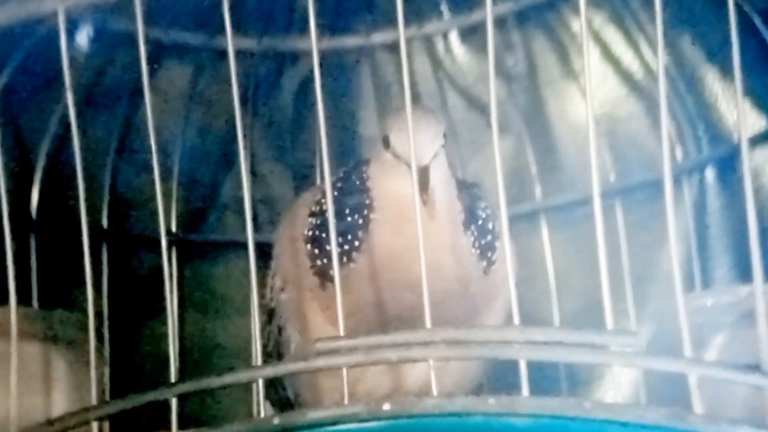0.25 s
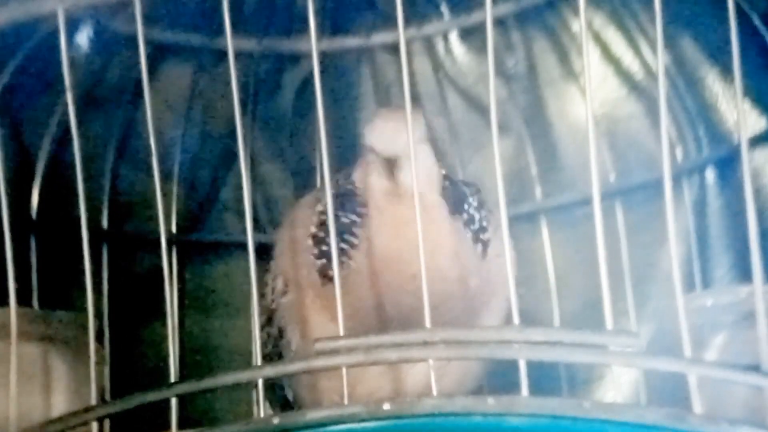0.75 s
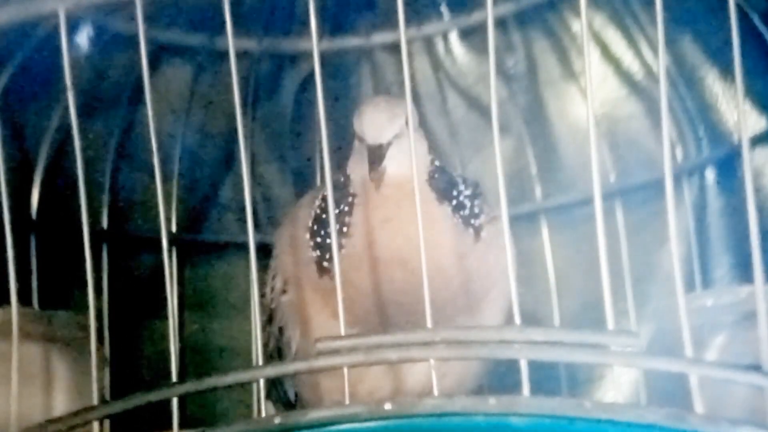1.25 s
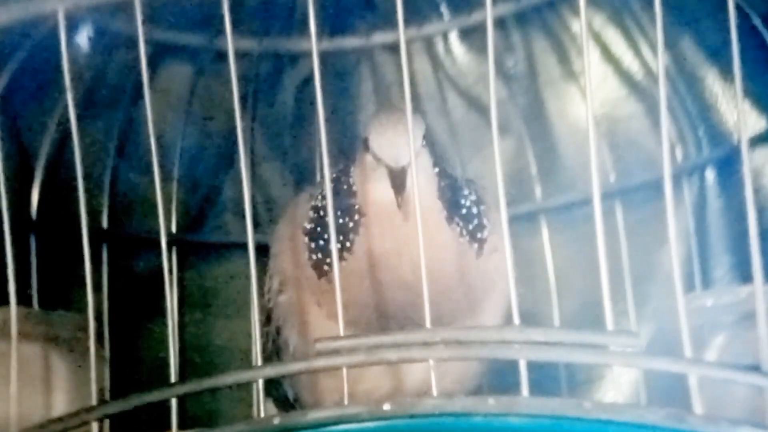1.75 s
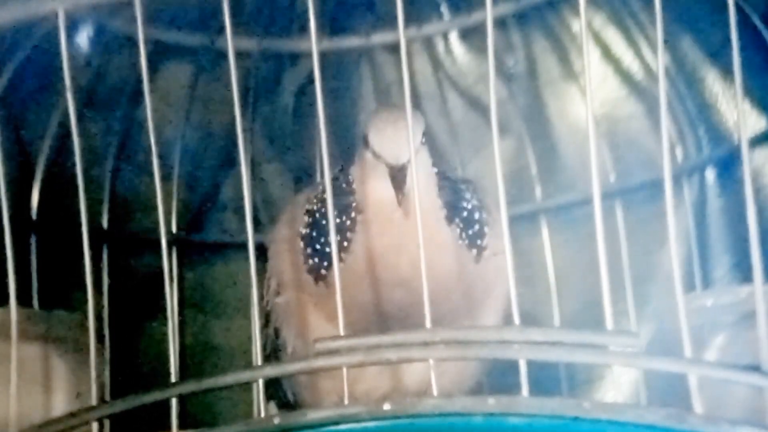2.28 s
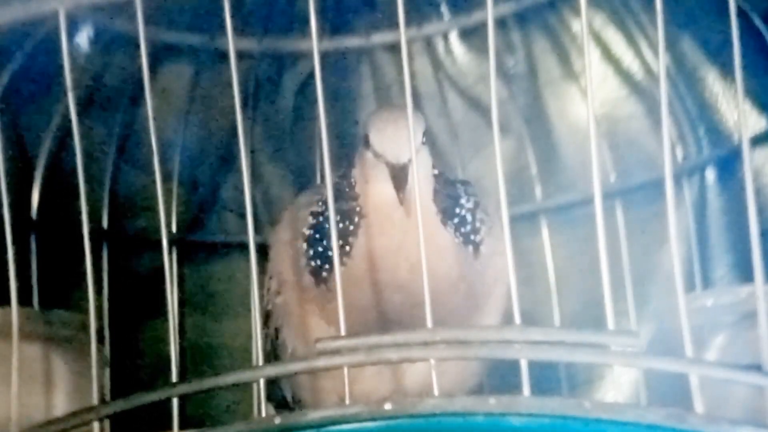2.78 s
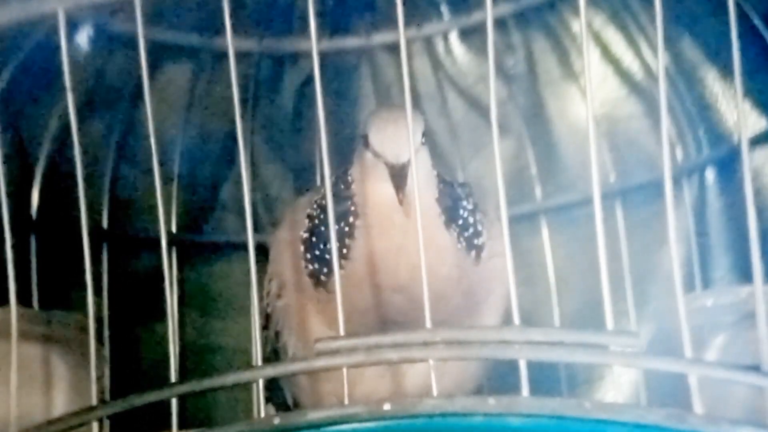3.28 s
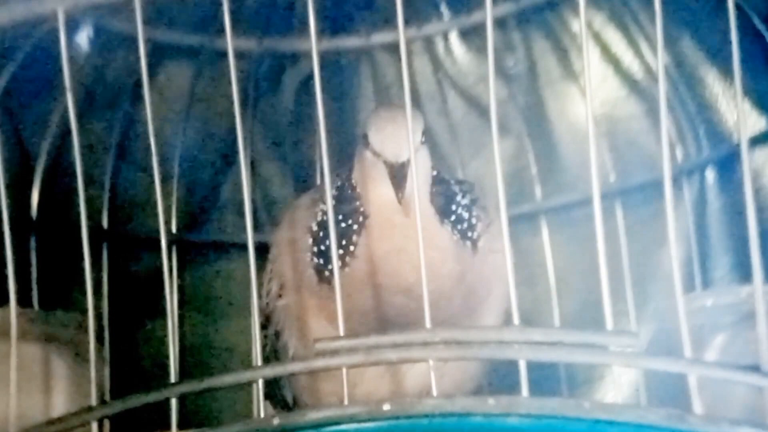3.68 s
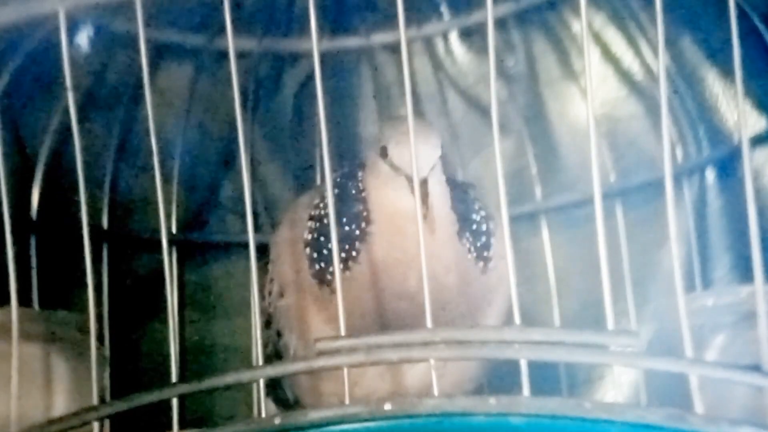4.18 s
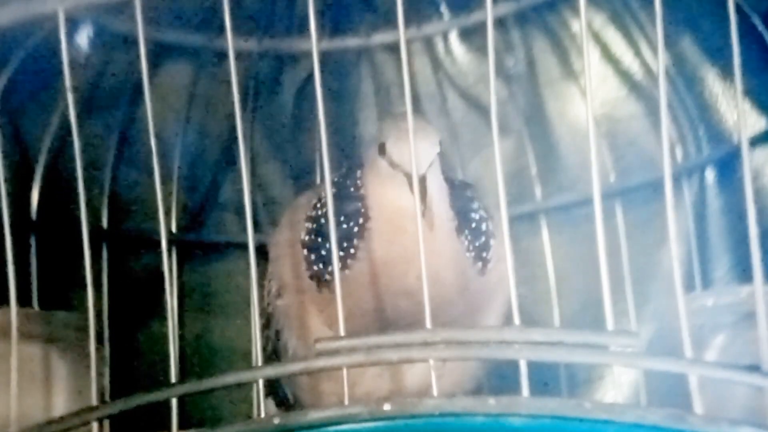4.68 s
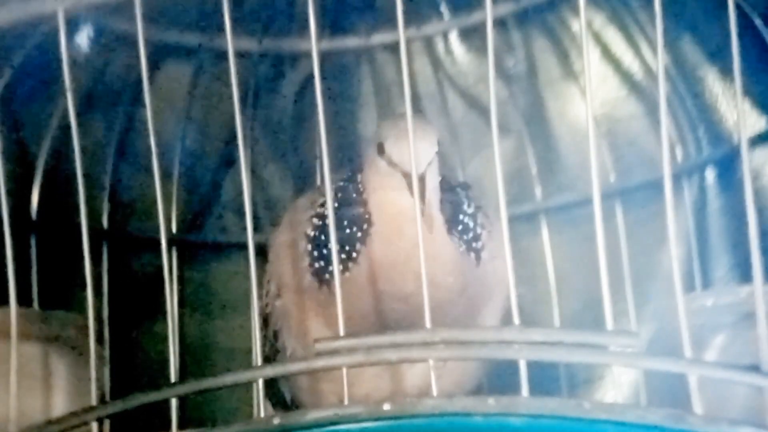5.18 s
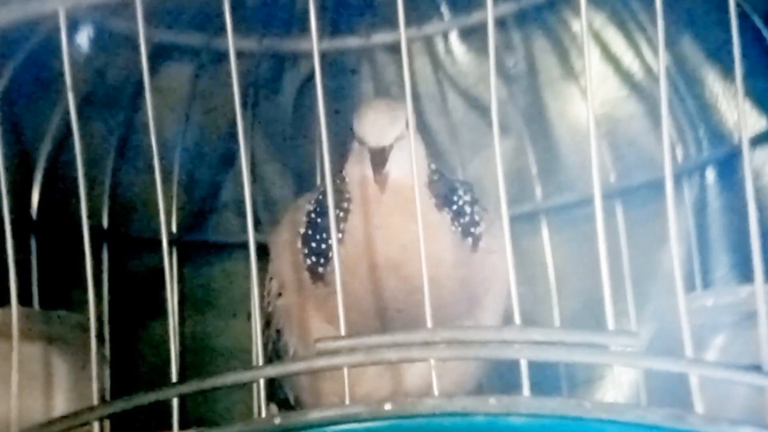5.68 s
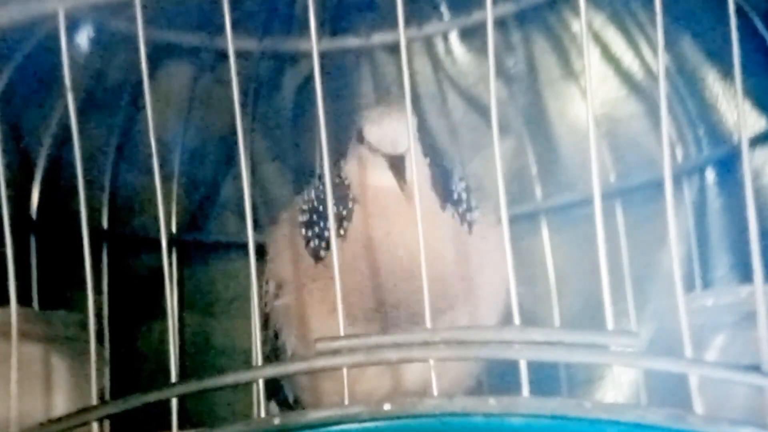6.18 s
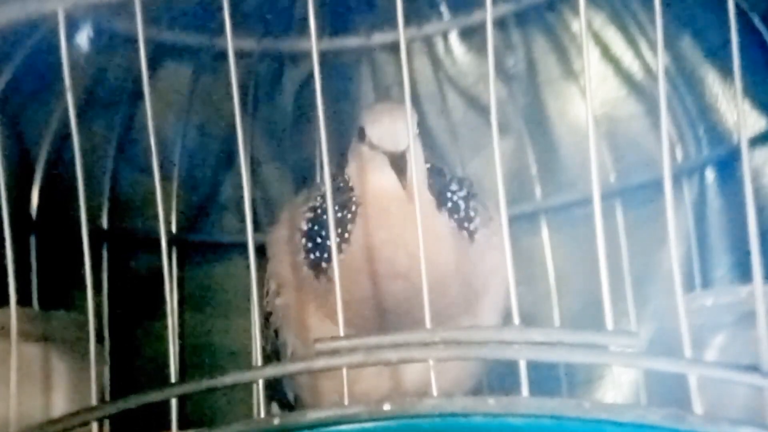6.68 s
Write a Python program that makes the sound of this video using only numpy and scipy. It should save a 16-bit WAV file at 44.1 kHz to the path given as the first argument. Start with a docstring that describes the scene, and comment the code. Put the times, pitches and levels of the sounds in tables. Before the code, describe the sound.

A caged dove coos close by in low, purring three-note phrases, with one dull woody bang and faint small birds chirping in a quiet yard.

```python
"""Caged dove in a yard

A caged spotted dove coos close by in three-note phrases: near-pure tones that flutter into a purr.
Standing waves ring its cage, shaped noise gives its feathers, its perch and the hiss of a single bang,
whose ring is a set of decaying modes. Small birds, as gliding tones with diffuse echoes, chirp and whistle
far off over a low outdoor murmur."""
import sys
import numpy as np
from scipy import signal
from scipy.fft import rfft, irfft
from scipy.io import wavfile
from scipy.ndimage import uniform_filter1d, minimum_filter1d

SR = 44100
rng = np.random.default_rng(int(sys.argv[2]) if len(sys.argv) > 2 else 0)


def generate_wav(sig):
    """Save sig (samples, or channels by samples) to the path in sys.argv[1] as 16-bit PCM at SR."""
    pcm = np.round(np.clip(np.atleast_2d(sig).T, -1, 1) * 32767).astype(np.int16)
    wavfile.write(sys.argv[1], SR, pcm)


N = 306054
TIME = np.arange(N) / SR


def gain_of(db):
    """Logarithmic level: decibels become an amplitude ratio."""
    return 10 ** (np.asarray(db) / 20)


def evened(x):
    """Power normalization: scales a signal to rms 1."""
    return x / np.sqrt(np.mean(x ** 2) + 1e-20)


def read(points, hz):
    """Spectral interpolation along a logarithmic frequency axis."""
    point_hz, value = np.transpose(points)
    return np.interp(np.log(hz + 1), np.log(point_hz + 1), value)


def curves(rows):
    """Linear interpolation: a time axis over the rows, and each further column along it."""
    s, *columns = np.transpose(rows)
    t = np.arange(s[0], s[-1], 1 / SR)
    return [t] + [np.interp(t, s, column) for column in columns]


def add(mix, s, sound):
    """Superposition: adds a sound at time s, which may lie before time 0."""
    at = round(s * SR)
    sound = sound[max(-at, 0):]
    part = mix[max(at, 0):][:len(sound)]
    part += sound[:len(part)]


def swell(t, centre_s, half_s):
    """Gaussian envelope of height 1; half_s is its half length at 1/e."""
    return np.exp(-((t - centre_s) / half_s) ** 2)


def wander(size, rate_hz):
    """Low-passed noise: a random fluctuation, of rms 1 over the whole scene's length."""
    hz = np.fft.rfftfreq(N, 1 / SR)
    lowpass = np.exp(-(hz / rate_hz) ** 2)
    return evened(irfft(rfft(rng.standard_normal(N)) * lowpass, N))[:size]


def tone(hz, overtones):
    """Harmonic series on a moving pitch, phase being the integral of frequency; 0 dB is rms 1."""
    phase = 2 * np.pi * np.cumsum(hz) / SR
    return np.sqrt(2) * sum(gain_of(db) * np.sin(round(multiple) * phase) for multiple, db in overtones)


# likeness of diffuse noise at the two microphones: frequency_hz, correlation (-1 to 1)
COHERENCE = [(60, .88), (300, .82), (640, .25), (1400, 0), (15000, .05)]
# spectral difference between the microphones: frequency_hz, left_minus_right_db
LEFT_RIGHT_TILT = [(110, 0.5), (200, -1), (380, 3), (700, 5), (1300, 2), (2400, -2), (5000, -0.5),
                   (9000, -6.5), (15000, -3)]


def noise(spectrum):
    """Diffuse-field coherence: the microphones agree in the bass and hardly at all in the treble."""
    hz = np.fft.rfftfreq(N, 1 / SR)
    a, b = rfft(rng.standard_normal((2, N)))
    same = np.clip(read(COHERENCE, hz), -1, 1)
    pair = np.array([a, same * a + np.sqrt(1 - same ** 2) * b])
    pair *= gain_of(np.outer([.5, -.5], read(LEFT_RIGHT_TILT, hz)))
    x = irfft(pair * gain_of(read(spectrum, hz)), N)
    return x / x.mean(0).std()  # the mean of the two channels has rms 1


# ring time of the yard: frequency_hz, t60_s
YARD_RING = [(150, 0.63), (400, 0.76), (1000, 0.52), (2800, .36), (8000, 0.77)]


def dying(x):
    """Exponential reverberant decay: each band fades at the yard's own ring time."""
    hz, t, bands = signal.stft(x, SR, nperseg=256)
    fade_db = -60 * t / read(YARD_RING, hz)[:, None]
    return signal.istft(bands * gain_of(fade_db), SR, nperseg=256)[1]


def yard(x):
    """Diffuse reverberation: convolution with decaying noise, independent at each microphone."""
    tail = dying(rng.standard_normal((2, SR)))
    tail[:, :300] = 0  # the echoes come after a short gap
    return signal.fftconvolve(x[None], tail / np.linalg.norm(tail[0]), axes=1)[:, :N]


# spectrum of the outdoor murmur: frequency_hz, relative_density_db (per Hz)
MURMUR_SPECTRUM = [(15, -69.5), (25, -30), (103, -1.5), (268, -9), (306, -7), (357, -13), (436, -5),
                   (569, -15.5), (650, -13.5), (794, -15.5), (868, -13), (991, -25), (1060, -24),
                   (2510, -36.5), (5000, -68), (6500, -70), (11000, -120)]
# slow course of the murmur's level: time_s, level_db
MURMUR_LEVEL = [(0, -48), (2.5, -47), (4.6, -46), (5.7, -51.5), (6.94, -43.5)]
# faint hums: frequency_hz, level_db (against the murmur)
MURMUR_HUMS = [(104, -6.5), (150, -11), (298, -12), (400, -11), (442, -15), (542, -11), (640, -8.5),
               (700, -12.5), (845, -20.5)]


def murmur(murmur_db=0.0, swell_db=1.64):
    """Broadband ambient noise, with narrow-band hums whose pitch and amplitude waver."""
    level_db = np.interp(TIME, *np.transpose(MURMUR_LEVEL)) + swell_db * wander(N, 18)
    out = gain_of(murmur_db) * noise(MURMUR_SPECTRUM)
    for hz, db in MURMUR_HUMS:
        hum = tone(hz + 6 * wander(N, 14), [(1, db)]) * (1 + .35 * wander(N, 14))
        out += gain_of([[.5], [-.5]] * read(LEFT_RIGHT_TILT, np.array([hz]))) * hum
    return gain_of(level_db) * out


def thin_tone(length, hz, db, waver, droop_hz=0):
    """Frequency modulation: one soft-edged note that wavers and may droop in pitch."""
    size = int(length * SR)
    pitch_hz = (hz - droop_hz * np.linspace(0, 1, size)) * (1 + waver * wander(size, 140))
    return gain_of(db) * signal.windows.tukey(size, .4) * tone(pitch_hz, [(1, 0)])


# far whistled notes, and at 1.771 s a thin high overtone of the dove's rising coo:
# start_s, length_s, pitch_hz, relative_level_db
WHISTLES_AND_OVERTONE = [(.39, .29, 2160, -63), (1.771, .13, 3160, -59.5), (2.233, 0.2, 1460, -46),
                         (2.512, 0.11, 1650, -45), (2.718, 0.19, 1610, -57), (3.262, 0.29, 1454, -48),
                         (3.62, .14, 1655, -41.5), (3.656, 0.18, 1416, -51.5), (3.837, 0.17, 1640, -40.5),
                         (3.997, .27, 1630, -48)]
# another bird's thin high notes: start_s, length_s, relative_level_db
HIGH_NOTES = [(4.48, 0.092, -55), (4.961, 0.22, -59), (5.354, 0.44, -64), (5.866, 0.32, -60.5),
              (6.14, 0.47, -60.5), (6.598, 0.31, -57.5)]
HIGH_HZ, HIGH_SINK_HZ_PER_S = 6530, 260  # pitch at the start of the series, and how fast the series sinks
# far-off haze round the whistles: frequency_hz, relative_density_db (per Hz)
HAZE_SPECTRUM = [(200, -28), (450, 5.5), (720, 12), (950, -7.5), (1300, -4.5), (1600, -7), (1950, -6),
                 (2300, -20), (4000, -32.5)]
HAZE_AT_S, HAZE_WIDTH_S, HAZE_TOP_DB, HAZE_REST_DB = 3.7, 1.0, -47, -72.5  # it swells once


def whistles_and_overtone(direct_db=-10, echo_db=-2):
    """Direct-to-reverberant ratio: far whistles and one overtone of the coo, mostly as echoes, in a haze."""
    out = np.zeros(N)
    for s, length, hz, db in WHISTLES_AND_OVERTONE:
        add(out, s, thin_tone(length, hz, db, waver=0.019))
    for s, length, db in HIGH_NOTES:
        hz = HIGH_HZ - HIGH_SINK_HZ_PER_S * (s - HIGH_NOTES[0][0])
        add(out, s, thin_tone(length, hz, db, waver=0.012, droop_hz=109))
    haze_level = gain_of(HAZE_REST_DB) + gain_of(HAZE_TOP_DB) * swell(TIME, HAZE_AT_S, HAZE_WIDTH_S)
    return gain_of(direct_db) * out + gain_of(echo_db) * yard(out) + haze_level * noise(HAZE_SPECTRUM)


# falling chirps of a small bird: reference_moment_s, relative_level_db
CHIRP_TIMES = [(0.527, -46.5), (1.726, -43.5), (2.701, -46.5), (3.616, -43.5), (4.646, -42.5)]
# shape of one chirp: time_s (from the reference moment), pitch_hz, relative_level_db, rasp (share of pitch)
CHIRP_SHAPE = [(-.125, 4575, -21.5, 0.0015), (-.08, 4480, -10, 0.011), (-.036, 3927, -8, 0.028),
               (-.02, 3700, -9, 0.063), (-.006, 3036, -1, 0.035), (.012, 2820, 3.5, .05),
               (.04, 2847, -6.5, 0.038), (.058, 2880, -21, 0.026)]


def chirps(level_db=-6, direct_db=-3):
    """Downward glide with random frequency modulation as rasp, drawn out by the yard's reverberation."""
    out = np.zeros(N)
    t, hz, shape_db, rasp = curves(CHIRP_SHAPE)
    for s, db in CHIRP_TIMES:
        raspy_hz = hz * (1 + rasp * wander(len(t), 250))
        add(out, s + t[0], gain_of(db + shape_db) * tone(raspy_hz, [(1, 0.018)]))
    return gain_of(level_db) * (gain_of(direct_db) * out + yard(out))


# the bang and its first echoes: start_s, blow_level_db
BLOWS = [(2.8803, 6.5), (2.8846, -4), (2.906, -10)]
# what the struck thing rings with: frequency_hz, start_level_db, t60_s
STRUCK_MODES = [(594, -29.5, 0.55), (775, -22.5, 0.67), (944, -38, 0.38), (1630, -40, .26),
                (1880, -33.5, 0.31)]
# spectrum of the bang's tail: frequency_hz, relative_density_db (per Hz)
BANG_TAIL_SPECTRUM = [(59, -60), (100, -18.5), (183, -26.5), (279, -17.5), (626, -7.5), (751, -13.5),
                      (870, -14.5), (1620, -18.5), (1780, -27.5), (1950, -24.5), (8000, -87), (10400, -100),
                      (17600, -120)]


def bang(ring_hz=700, ring_s=0.0023, rise_s=0.0014, tail_db=-17, swell_s=0.0068, right_db=-4):
    """Impulse excitation of damped modes: a dull blow, a woody ring, two hard echoes and the yard's tail."""
    t = TIME[:SR]
    blow = (1 - np.exp(-(t / rise_s) ** 2)) * np.exp(-t / ring_s) * np.sin(2 * np.pi * ring_hz * t)
    direct, tails = np.zeros(N), np.zeros((2, N))
    start = BLOWS[0][0]
    ring = sum(gain_of(db - 60 * t / t60) * np.sin(2 * np.pi * hz * t) for hz, db, t60 in STRUCK_MODES)
    add(direct, start, ring)
    for s, db in BLOWS:
        add(direct, s, gain_of(db) * blow)
    for channel, tail in zip(tails, dying(noise(BANG_TAIL_SPECTRUM)[:, :SR])):
        add(channel, start, tail[:SR] * (1 - np.exp(-t / swell_s)))
    return direct * gain_of([[0], [right_db]]) + gain_of(tail_db) * tails


# thuds as the dove bears down on its perch: loudest_moment_s, half_length_s, level_db
PERCH_THUDS = [(0.079, 0.16, -45), (2.36, .05, -44.5), (4.73, 0.03, -44.5)]
# spectrum of a thud: frequency_hz, relative_density_db (per Hz)
THUD_SPECTRUM = [(25, -26.5), (60, -1), (110, 2.5), (200, -13.5), (400, -33), (1500, -78.5)]


def perch():
    """Low-frequency noise bursts: soft, dull thuds as the dove bears down on its perch."""
    level = sum(gain_of(db) * swell(TIME, s, half_s) for s, half_s, db in PERCH_THUDS)
    return level * noise(THUD_SPECTRUM)


# the dove shifts its feathers; at 2.933 s, the bang's bright hiss:
# loudest_moment_s, half_length_s (before rise and fall), relative_level_db
RUSTLES_AND_HISS = [(0.067, 0.082, -66.5), (1.79, .07, -68.5), (2.495, 0.073, -58), (2.933, .09, -63),
                    (3.319, 0.022, -56), (3.4, 0.076, -56.5), (3.68, .09, -69.5), (3.808, .03, -61),
                    (3.958, 0.042, -49.5), (4.149, 0.069, -54.5), (4.82, 0.029, -57.5), (5.802, 0.067, -62),
                    (6.045, 0.16, -71), (6.46, 0.012, -45), (6.488, 0.099, -57.5), (6.678, 0.054, -56.5)]
# spectrum of feathers, lent to the bang's hiss: frequency_hz, relative_density_db (per Hz)
FEATHER_SPECTRUM = [(1000, -2.5), (2500, 2), (4500, 7), (7500, 4), (12000, 1.5), (15000, -2)]


def feathers_and_hiss(rest_db=-72, grain_db=2.0, rustle_db=-6.0, rise=0.8, fall=1.6):
    """Grainy noise bursts: feather friction and the bang's bright hiss, over a faint steady hiss."""
    level = np.zeros(N)
    for s, half_s, db in RUSTLES_AND_HISS:
        level += gain_of(db) * swell(TIME, s, half_s * np.where(TIME < s, rise, fall))
    grain = gain_of(rustle_db + grain_db * wander(N, 300))
    return (gain_of(rest_db) + level * grain) * noise(FEATHER_SPECTRUM)


# standing waves round the cage: frequency_hz, width_hz, left_gain, right_gain (before the right's loss),
# right_lead_rad
CAGE_MODES = [(641.3, 12, 3.15, 1.6, 2.5), (589.9, 16, 1.6, 1.2, -0.76), (457.3, 54, 0.85, 0.38, 0.3),
              (737, 15, 2.4, 0.45, 1.76), (381, 8.4, 3.2, 1.4, -0.2), (820, 37, 3.3, 0.34, 2.6)]


def cage(x, right_db=-3):
    """Resonance: standing waves swell as the pitch passes them; the right microphone is farther."""
    out = np.array([x, x])
    for hz, width, left, right, lead in CAGE_MODES:
        r = np.exp(-np.pi * width / SR)
        ring = 2 * signal.lfilter([1 - r], [1, -r * np.exp(2j * np.pi * hz / SR)], x)
        out += np.outer([left, right * np.exp(1j * lead)], ring).real
    return out * gain_of([[0], [right_db]])


# the three notes of a phrase, each: time_s (from its start), pitch_hz, effort_db, purr_depth (0-1),
# all before the variations of the single coo
SHORT = [(0, 422.3, -49.5, 0.6), (.017, 497.3, -20.5, 0), (.036, 567, -19.5, 0.16), (.06, 570, -15.5, 0),
         (.088, 470, -21.5, .5), (.113, 409.6, -34.5, 0.7), (.16, 444, -38, 0.4)]
RISING = [(0, 429.8, -41, 0.72), (.045, 457.4, -36, 0.5), (.09, 500.6, -20, 0.61), (.15, 582.7, -16.5, 0.4),
          (.19, 616.5, -20, 0.34), (.226, 633.2, -11.5, 0.044), (.25, 619, -11, .05), (.27, 500.7, -18, 1),
          (.295, 427.3, -42, .4)]
LONG = [(0, 394, -47, 0.35), (.02, 512.3, -24.5, 0.94), (.065, 634.9, -17, .55), (.12, 623.6, -12, 0.38),
        (.21, 601.3, -16, 0.79), (.285, 592, -16.5, 0.37), (.357, 581.7, -14, .04), (.41, 553.4, -17, 0.24),
        (.48, 523.8, -19, .1), (.517, 487, -20.5, .1), (.537, 464, -32, .4)]
NOTE_SHAPES = {"short": SHORT, "rising": RISING, "long": LONG}
# a long note chokes for a moment and purrs fully: centre_s, half_length_s, depth_db
CHOKED_MOMENTS = [(0.023, 0.017, 7.5), (0.093, .015, 6), (0.198, 0.013, 16.5), (2.383, 0.0075, 11),
                  (4.573, .03, 8), (6.913, .025, 5)]


def gesture(start, note, stretch, pitch, level_db, purring):
    """Control curves of phonation: time, pitch, effort and purr of one coo, with any catch in it."""
    shape = np.array(NOTE_SHAPES[note]) * [stretch, pitch, 1, purring] + [start, 0, level_db, 0]
    t, hz, effort_db, purr = curves(shape)
    for s, half_s, depth_db in CHOKED_MOMENTS:
        catch = swell(t, s, half_s)
        effort_db = effort_db - depth_db * catch
        purr = purr + (1 - purr) * catch
    return t, hz, effort_db, np.clip(purr, 0, 1)


# overtones of the coo: multiple (of the pitch), relative_level_db
COO_OVERTONES = [(2, -36.5), (3, -57.5), (5, -60)]
MID_PITCH_HZ = 600
# air whistles thinly through the nostrils: pitch and level at the coo's middle pitch, waver as a share
NOSTRIL_HZ, NOSTRIL_DB, NOSTRIL_WAVER = 6020, -48.5, .026
NOSTRIL_FOLLOWS = .36  # its pitch goes as the coo's pitch to this power


def coo(t, hz, effort_db, purr, flow_db, purr_hz=56, uneven=.13, sag_hz=110, choke_db=8, rough_db=5.0,
        second_hz=486, second_db=-8, weak_db=-33, strain=0.76, build_s=0.046):
    """Syrinx oscillation: a near-pure tone that flutters in the purr, joined by the other side's lower tone."""
    size = len(t)
    beats = np.cumsum(purr_hz * (1 + uneven * wander(size, 20))) / SR
    dip = np.sin(np.pi * beats) ** 2  # pitch and loudness drop together once a beat
    jitter_hz = 20 * wander(size, 200)
    weak = np.minimum(gain_of(weak_db - effort_db), 1)  # with little air the tone turns husky
    pitch_hz = hz + purr * sag_hz * (.5 - dip) + (purr + 3 * weak) * jitter_hz
    pulse = gain_of(purr * (rough_db * wander(size, 85) - choke_db * dip))
    pulse /= np.sqrt(uniform_filter1d(pulse ** 2, size=2200))  # the flutter keeps the average power
    level = gain_of(effort_db) * signal.windows.tukey(size, .015)
    second = gain_of(second_db) * purr * tone(second_hz + jitter_hz, [(1, 0)])
    # the swollen throat radiates only a narrow band, so the flutter stays soft
    throat = signal.butter(2, [390, 790], "bandpass", fs=SR, output="sos")
    hollow = signal.sosfiltfilt(throat, level * (pulse * tone(pitch_hz, [(1, 0.013)]) + second))
    # pressure builds as the note goes on and rises, and with it the overtones and the rush of air
    pitch_ratio = hz / MID_PITCH_HZ
    build = 1 - np.exp(-(t - t[0]) / build_s)
    flow = uniform_filter1d(level, size=1500) * build * pitch_ratio ** strain
    overtones = tone(hz + purr * jitter_hz, COO_OVERTONES)
    nostril_hz = NOSTRIL_HZ * pitch_ratio ** NOSTRIL_FOLLOWS * (1 + NOSTRIL_WAVER * wander(size, 500))
    nostril = tone(nostril_hz, [(1, NOSTRIL_DB + flow_db)])
    return hollow + flow * (pulse * overtones + nostril), gain_of(flow_db) * flow


# the coos: start_s, note, length_factor, pitch_factor, level_db (added to effort), purr_factor, air_db
COOS = [(-.114, "long", .965, 1.003, .7, .7, .5), (1.495, "short", .99, .99, -1, 1.1, -9),
        (1.638, "rising", 1.001, 1.001, -.5, 1.15, -2), (2.078, "long", 1.001, 1.001, -.5, 1.2, -1.5),
        (3.845, "short", 1.02, 1.005, -.3, 1.01, -6), (4.004, "rising", .975, 1.001, .4, .75, -.5),
        (4.423, "long", .99, 1.001, .3, .9, .5), (6.115, "short", .98, 1.008, .5, .8, .5),
        (6.268, "rising", .995, 1.001, .5, .72, 1.5), (6.698, "long", 1.001, 1.001, 1.2, .8, 3)]
# a short low grunt between phrases: time_s, pitch_hz, level_db (before the overtone levels)
GRUNT_SHAPE = [(1.03, 306, -47.5), (1.042, 309.5, -38.5), (1.058, 352.6, -35), (1.075, 332, -46.5),
               (1.095, 310, -44.5)]
# overtones of the grunt: multiple (of the pitch), relative_level_db
GRUNT_OVERTONES = [(1, -2.5), (2, 0.5), (3, -10.5)]
# air rushing through the throat with a coo: frequency_hz, relative_density_db (per Hz)
AIR_SPECTRUM = [(30, -14.5), (70, 2.5), (130, 0), (300, -3.5), (500, -20.5), (850, 5.5), (1300, -8),
                (2000, -21.5), (4500, -37), (5800, -9.5), (6600, -35.5), (15000, -42)]
# husky rasp that goes with the purr: frequency_hz, relative_density_db (per Hz)
RASP_SPECTRUM = [(40, -20), (100, -0.5), (200, -2.5), (330, -1), (500, -9.5), (850, 7), (1000, -4.5),
                 (1200, -4.5), (1400, -23.5), (2200, -32), (5000, -49.5)]
RASP_DB, RASP_FOLLOWS = -27, 0.54  # level at full purr and 0 dB effort, and the share of effort it follows


def dove(air_db=-35, yard_db=-21, chest_db=-48):
    """Source and resonator: coos and grunt ring the cage, with turbulent air, rasp and brushing chest."""
    voice, flow, rasp, grunt = np.zeros((4, N))
    for start, *manner, flow_db in COOS:
        t, hz, effort_db, purr = gesture(start, *manner)
        sound, air_level = coo(t, hz, effort_db, purr, flow_db)
        rasp_level = purr * gain_of(RASP_DB + RASP_FOLLOWS * effort_db)
        add(voice, start, sound)
        add(flow, start, air_level)
        add(rasp, start, rasp_level * signal.windows.tukey(len(t), .1))
    t, hz, db = curves(GRUNT_SHAPE)
    rough_hz = hz * (1 + 0.11 * wander(len(t), 200))
    add(grunt, t[0], gain_of(db) * tone(rough_hz, GRUNT_OVERTONES))
    breath = gain_of(air_db) * noise(AIR_SPECTRUM)
    chest = gain_of(chest_db) * noise(FEATHER_SPECTRUM)  # the swelling chest brushes
    air = flow * (breath + chest) + rasp * noise(RASP_SPECTRUM)
    return cage(voice + grunt) + gain_of(yard_db) * yard(voice + grunt) + air


def scene():
    """Superposition of all sources at the two microphones."""
    return murmur() + whistles_and_overtone() + chirps() + bang() + perch() + feathers_and_hiss() + dove()


EDGE_HZ = 15800


def record(dry):
    """Peak limiting and band limiting: a smoothed gain holds the loudest beats under full scale."""
    limit = 1 / np.maximum(abs(dry).max(0) / .95, 1)
    held = dry * uniform_filter1d(minimum_filter1d(limit, size=400), size=400)
    held = held * signal.windows.tukey(N, .0008)  # soft ends
    lowpass = signal.firwin(511, EDGE_HZ, window=("kaiser", 9), fs=SR)
    return signal.oaconvolve(held, lowpass[None], "same")


dry = scene()
out = record(dry)
generate_wav(out)
```